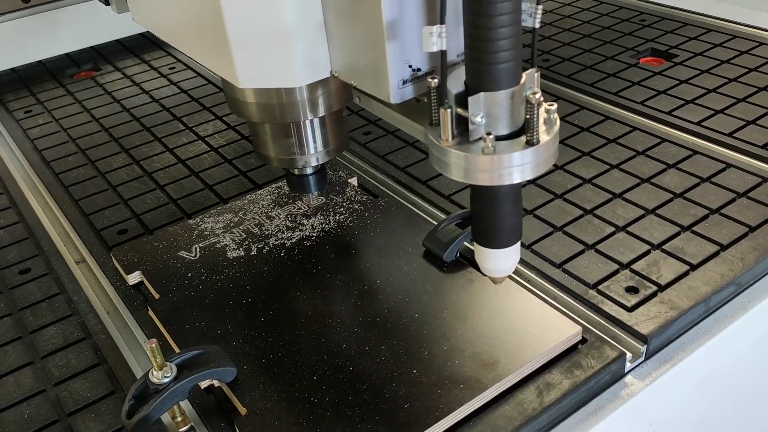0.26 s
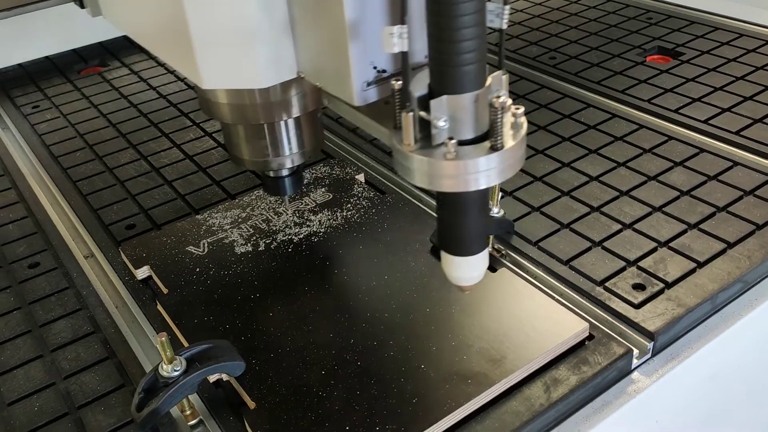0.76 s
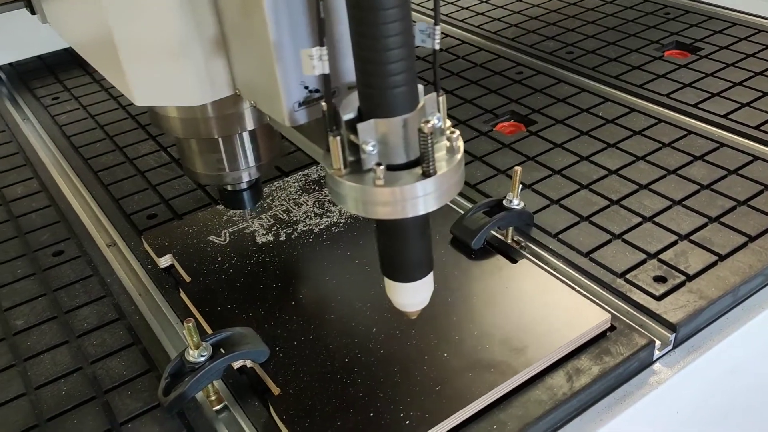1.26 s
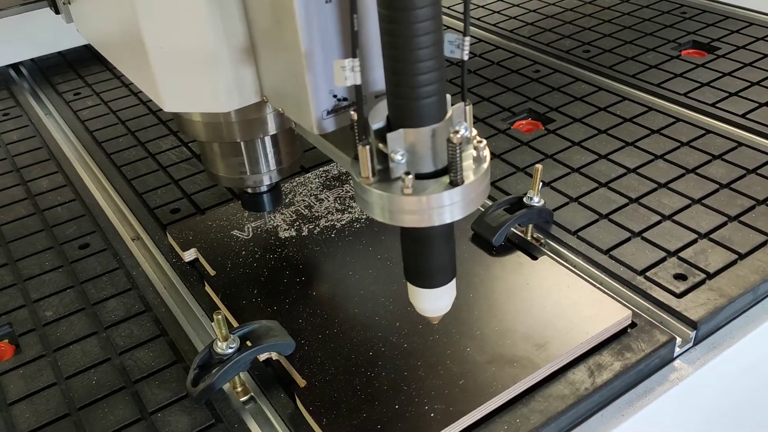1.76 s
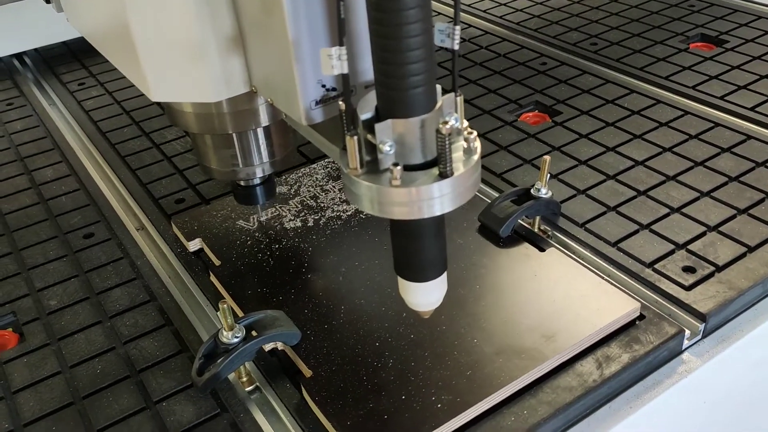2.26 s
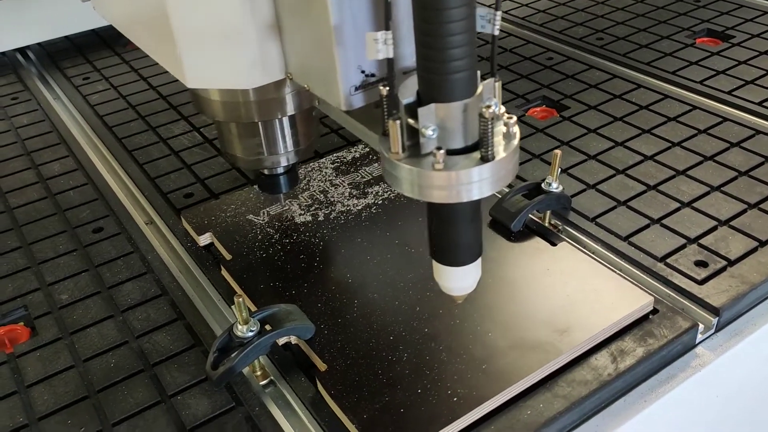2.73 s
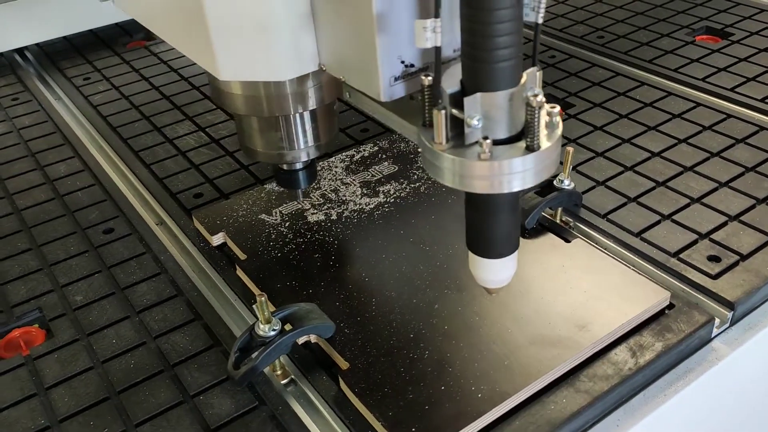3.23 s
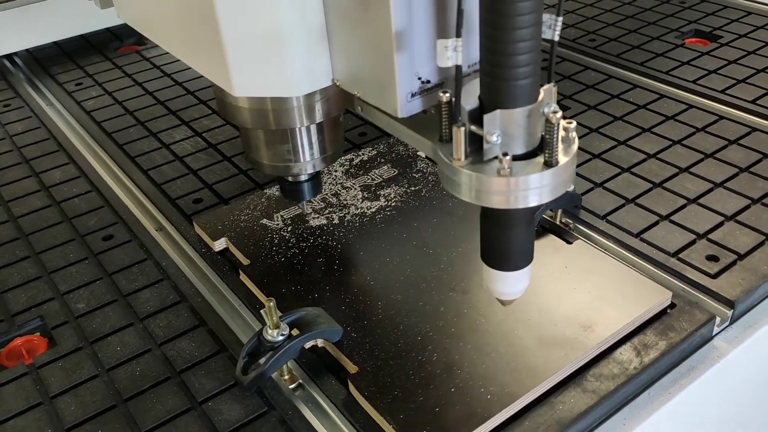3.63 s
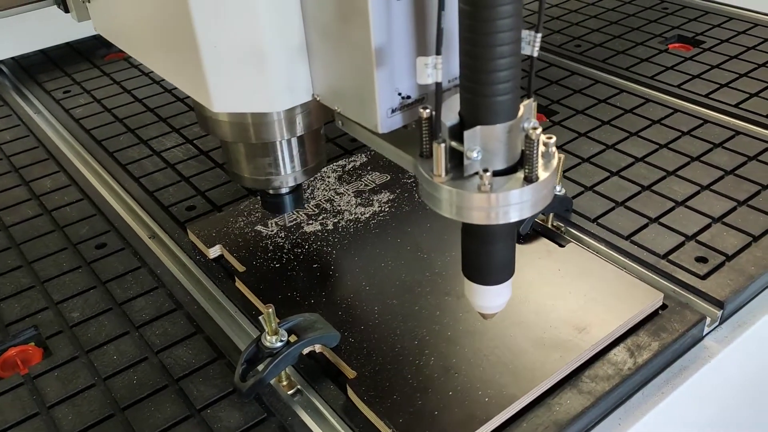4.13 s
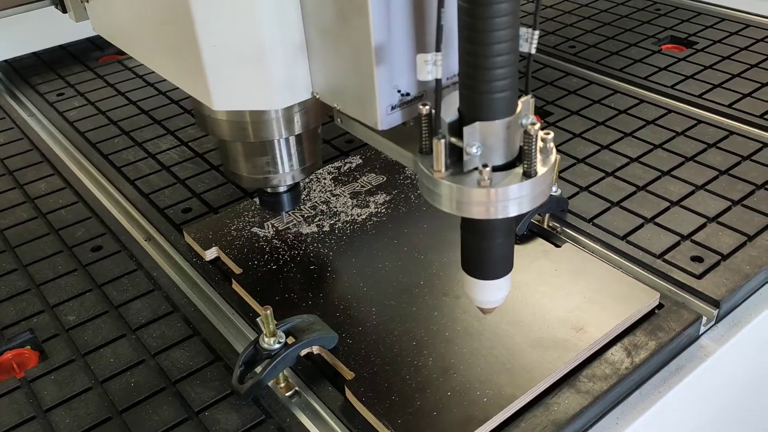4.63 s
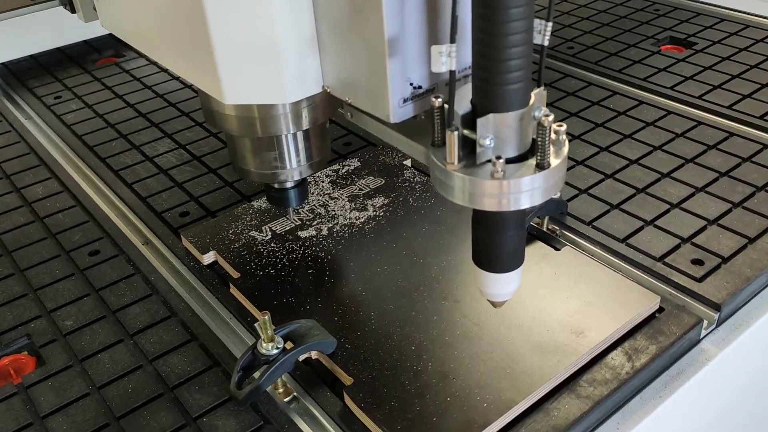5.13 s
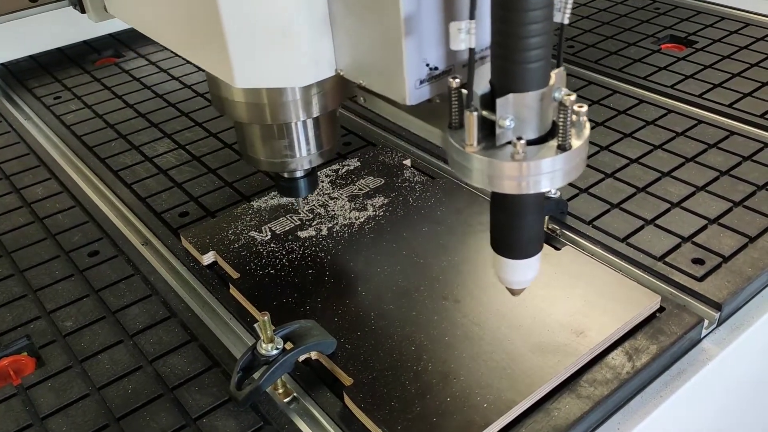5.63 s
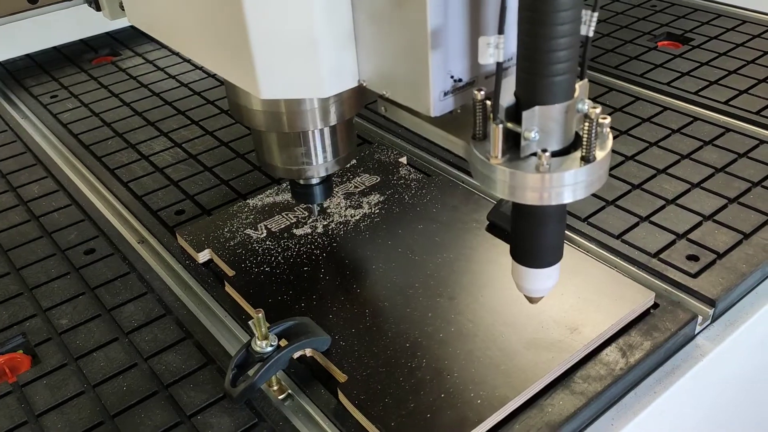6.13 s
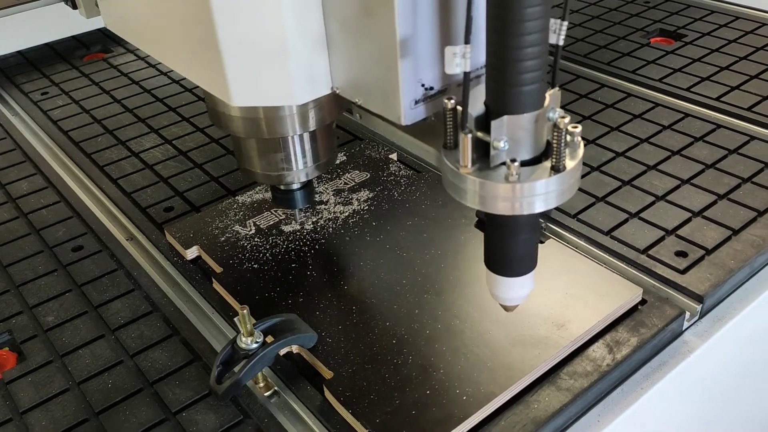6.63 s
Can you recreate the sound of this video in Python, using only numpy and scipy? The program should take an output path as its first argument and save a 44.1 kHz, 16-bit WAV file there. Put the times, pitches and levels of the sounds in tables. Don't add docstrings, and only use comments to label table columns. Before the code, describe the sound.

Close to an engraving router: constant smooth hum around a low-mid pitch, fan wash and a faint piercing whine. The tool bites metal at about 1.4, 3.5 and 6.4 seconds, adding harsh higher buzz and chip scrape that shift with each stroke, then stops quickly. The middle cut is a little softer, the last strongest. Phone microphone, slightly gated highs.

```python
import sys
import numpy as np
from scipy import signal
from scipy.io import wavfile
from scipy.ndimage import uniform_filter1d

SR = 44100
rng = np.random.default_rng(int(sys.argv[2]) if len(sys.argv) > 2 else 0)


def transcribe(signal):
    frames = np.atleast_2d(signal).T
    limited = np.clip(frames, -1, 1)
    pcm = np.round(limited * 32767).astype(np.int16)
    wavfile.write(sys.argv[1], SR, pcm)


def how_loud(loudness_db):
    steps = np.asarray(loudness_db, float) / 20
    return 10 ** steps


N = 303408

SHAFT_HZ, CARRIER_HZ = 294.2, 6000.4
HUM_DRAG_RAD = .3


def evened(x):
    return x / np.sqrt(np.mean(abs(x) ** 2) + 1e-20)


def read(points, hz):
    f, value = np.transpose(points)
    return np.interp(np.log(hz + 1), np.log(f + 1), value)


def columns(rows, t):
    s, *rest = np.transpose(rows)
    return [np.interp(t, s, c) for c in rest]


def drift(hz, count=1):
    a, b = rng.standard_normal((2, count, 4096))
    step = N // 4095 + 1
    f = np.fft.fftfreq(4096, step / SR)
    smooth = np.fft.fft(a + 1j * b) / (1 + (f / hz) ** 2)
    slow = evened(np.fft.ifft(smooth)).astype(np.complex64)
    part = (np.arange(step) / step).astype(np.float32)
    ramps = slow[:, :-1, None] + np.diff(slow)[:, :, None] * part
    return ramps.reshape(count, -1)[:, :N]


def tone(angle, db, lean_db=0, lead=0):
    side, angle = np.array([[.5], [-.5]]), (angle % (2 * np.pi)).astype(np.float32)
    wave = np.float32(np.sqrt(2) * how_loud(db)) * (np.cos(angle) + np.complex64(1j) * np.sin(angle))
    return wave * (how_loud(side * lean_db) * np.exp(1j * side * lead)).astype(np.complex64)


def noise(level_db, patchy_db):
    # pitch_hz, likeness (-1 to 1)
    likeness = [(60, .997), (160, .98), (300, .75), (480, .9), (800, .4), (1400, 0.05), (5300, 0.05),
                (6400, .85), (15000, .75)]
    # pitch_hz, left_right_db
    noise_lean = [(300, -0.5), (800, 0), (1600, 4.5), (2500, 2.5), (3600, -6), (5300, 3.5), (15000, -13.5)]
    port_lag_s = .0001
    frames, hz = N // 256 + 5, np.fft.rfftfreq(1024, 1 / SR)
    a, b, c, d, patches = np.ascontiguousarray(rng.standard_normal((frames, 513, 5), np.float32).T)
    patches = evened(uniform_filter1d(uniform_filter1d(patches, 12, 0), 14, 1))
    same = np.float32(np.clip(read(likeness, hz), -1, 1)[:, None])
    left = a + 1j * b
    right = same * left + np.sqrt(1 - same ** 2) * (c + 1j * d)
    z = np.array([left, right])
    z[1] *= np.exp(2j * np.pi * port_lag_s * hz * (hz < 5200))[:, None]
    sample = signal.istft(left[:, :200], nperseg=1024, noverlap=768)[1][1024:-1024]
    white = np.std(sample) / np.sqrt(SR / 2)
    lean_db = np.array([.5, -.5])[:, None, None] * read(noise_lean, hz)[:, None]
    z *= how_loud(level_db(hz[:, None], np.arange(frames) * 256 / SR) + lean_db + patchy_db * patches)
    return signal.istft(z, nperseg=1024, noverlap=768)[1][:, :N] / white


def toolpath(t):
    # plunge_s, depth_db, squeal across the grain_db, order 4 extra_db, rasp edge_db
    cuts = [
        (-1.19, -1, 1.5, -2, 8),
        (1.432, 0, 0, 0, -1),
        (3.537, -1.2, -3.5, -.3, -1),
        (6.358, 2, .3, 2, -1),
    ]
    # start after plunge_s, start load (0-1), end load (0-1), sideways feed (0-1), corner stall (0-1)
    strokes = [
        (0.0, .55, .7, .05, 0),
        (.083, .7, .8, .9, .8),
        (.218, 1, .9, .2, .6),
        (.318, .9, 1, .3, .25),
        (.818, .8, .8, 1, .8),
        (.948, 1, .75, .4, .8),
        (1.2, .72, .68, .15, .3),
        (1.488, .8, .85, 1.02, 0),
    ]
    # time_s, length_s, level against a full cut_db
    skims = [
        (.45, .1, -12),
        (1.3, .12, -14),
        (3.06, .04, -9),
        (3.25, .08, -15),
        (5.2, .1, -9),
        (5.44, .1, -7),
        (5.82, .06, -12),
        (6.08, .09, -6),
    ]
    lift_s, ease_s, turn_s, stall_s, ring_db_per_s = 1.542, .042, .022, .025, 400
    s = np.arange(-2, N / SR + 1, 1 / 500)
    contact, load, sideways, stall, skim, pressed = np.zeros((6, len(s)))
    starts, *_ = np.transpose(strokes)
    for plunge, *_ in cuts:
        u = s - plunge
        bite = np.clip(u / turn_s, 0, 1)
        contact += bite * how_loud(-ring_db_per_s * np.maximum(u - lift_s + turn_s, 0))
        pressed += bite * np.clip((lift_s - ease_s - u) / turn_s, 0, 1)
        for (a, first, last, across, stop), b in zip(strokes, [*starts[1:], 9]):
            on = np.clip((u - a) / turn_s + .5, 0, 1) - np.clip((u - b) / turn_s + .5, 0, 1)
            on = on * (u < lift_s + .3)
            load += on * np.interp(u, [a, min(b, lift_s)], [first, last])
            sideways += on * across
            stall += stop * np.exp(-((u - a) / stall_s) ** 2)
    for at, length, db in skims:
        skim += how_loud(db) * np.exp(-((s - at) / length) ** 2)
    running = np.maximum(np.searchsorted(np.array(cuts)[:, 0] - .1, s) - 1, 0)
    depth_db, squeal_db, fourth_db, rasp_db = np.array(cuts)[running, 1:].T
    curves = dict(contact=contact, skim=skim, load=load, sideways=sideways, stall=stall, pressed=pressed,
                  depth_db=depth_db, squeal_db=squeal_db, fourth_db=fourth_db, rasp_db=rasp_db)
    return {name: np.interp(t, s, curve) for name, curve in curves.items()}


def spindle(t, turn, path):
    # time_s, level_db, left_right_db
    hum_curve = [(0.0, -17, -1), (0.15, -16, -.9), (.3, -16.3, -.9), (0.62, -15.6, -.9), (0.78, -17, -1.1),
                 (1.4, -15.7, -.8), (2.9, -15.4, -.3), (3.45, -14.4, -.1), (4.2, -15.2, .2),
                 (4.95, -15.6, .1), (5.1, -14.9, .1), (5.55, -14, .2), (6.25, -15.2, .2), (6.88, -15, .6)]
    # time_s, level_db, left_right_db
    octave_curve = [(0.05, -45, -1.0), (1.03, -46, 3.5), (1.47, -54, 6.0), (1.62, -35, 5.0),
                    (1.7, -48, -2.5), (1.75, -44, 16.5), (1.96, -55, 3.5), (2.55, -37, 4.5),
                    (2.68, -40, -2.5), (3.52, -37, -3.5), (3.76, -45, -9.0), (3.91, -36, 1.0),
                    (4.37, -42, 1.0), (4.8, -37, -15.5), (5.56, -49, -3.5), (6.26, -42, -1.0),
                    (6.62, -47, -12.0), (6.85, -43, -14.5)]
    cut_db, load_db, stall_db = 1.5, 1.4, -2.2
    pressed, stall = path["pressed"], path["stall"]
    level_db, lean_db = columns(hum_curve, t)
    level_db = level_db + pressed * (cut_db + load_db * path["load"]) + stall_db * stall
    hum = tone(turn - HUM_DRAG_RAD * pressed, level_db, lean_db, lead=-.19) * (1 + 0.031 * drift(23))
    octave = tone(2 * turn + 3.7, *columns(octave_curve, t), lead=-0.99) * how_loud(1.5 - 4 * stall)
    return hum + octave * (1 + .13 * drift(27, count=2))


def cutter(turn, path):
    # level_db, change with sideways feed_db, with load_db,
    # in a stall_db, tool in the air_db
    order_rules = [(-40.5, -2, 11, -13, -60), (-34, .8, 3, -4, -60), (-43.5, 10, 2, -4, -61),
                   (-46, 9, 1.1, -3, -54)]
    # left_right_db, left lead_rad, start_rad
    order_ports = [(1.5, -0.88, -0.5), (12.5, 0.87, -2.5), (16, 0.92, 1.53), (10.5, 1.96, 0.7)]
    upper_db = [-13, -14, -18.5, -19, -69, -14.5, -42]
    blur = (.12, .12, .28, .45)
    skim_power, skim_tilt_db = 1.7, -6
    skim_waver = .6
    depth_db = path["depth_db"]
    extra_db = (0, path["fourth_db"], path["squeal_db"], -depth_db)
    skim = path["skim"] * abs(1 + skim_waver * drift(12)[0]) * how_loud(-1.2)
    out = 0
    for k, rule, own_db, rough, port in zip(range(3, 7), order_rules, extra_db, blur, order_ports):
        db, feed_db, load_db, stall_db, air_db = rule
        lean_db, lead, start = port
        cut_db = db + depth_db + own_db + feed_db * path["sideways"]
        cut_db = cut_db + load_db * path["load"] + stall_db * path["stall"]
        skim_gain = skim ** skim_power * how_loud(db + load_db + skim_tilt_db * (k - 3))
        gain = (path["contact"] * how_loud(cut_db) + skim_gain + how_loud(air_db)).astype(np.float32)
        out = out + gain * tone(k * turn + start, 0, lean_db, lead) * (1 + rough * drift(26, count=2))
    for k, db in zip(range(7, 14), upper_db):
        start = 2 * np.pi * rng.random()
        out = out + gain * tone(k * turn + start, db, 3) * (1 + 1.15 * drift(22, count=2))
    return out


def chips(turn):
    # pitch_hz, density against their level_db per Hz
    plate = [(300, -41), (700, -39), (1000, -29.5), (1320, -27.5), (1680, -20.5), (1950, -28.5),
             (2500, -34), (3400, -32.5), (4300, -35), (5300, -35.5), (6400, -33), (7300, -37.5),
             (9000, -49), (15500, -73)]
    cut_db, load_db, air_db, edge_air_db = -45, 3, -52.5, 6

    def density_db(hz, s):
        path = toolpath(s)
        contact = path["contact"]
        scrape = (contact + path["skim"]) * how_loud(cut_db + load_db * path["load"])
        level_db = 20 * np.log10(scrape + how_loud(air_db))
        edge_db = contact * path["rasp_db"] + (1 - contact) * edge_air_db - 3
        edge_shape = np.exp(-(np.log(hz / 2200 + 1e-9) / 0.21) ** 2)
        return read(plate, hz) + level_db + edge_db * edge_shape
    return noise(density_db, patchy_db=1.5) * (1 + 0.23 * np.cos(turn))


def echoes(t, hz, k):
    # time_s, plate path_mm, wall path_mm
    echo_paths = [(0.0, 43.1, 61.5), (0.46, 24.2, 45.3), (0.92, 34.3, 65.4), (1.38, 44.2, 16.0),
                  (1.83, 40.9, 2.4), (2.29, 35.5, -4.6), (2.75, 32.7, 3.9), (3.21, 11.0, -6.6),
                  (3.67, -7.9, -18.6), (4.13, -38.3, -18.5), (4.59, -35.0, -16.3), (5.05, -21.7, -21.5),
                  (5.5, -31.6, -16.8), (5.96, -45.4, -34.9), (6.42, -45.6, -38.1), (6.88, -39.8, -18.8)]
    plate_echo = [(0.99, 0.81, 0.66), (1.34, 0.1, 0.88), (0.26, 0.46, 0.36), (1.86, 0.49, 0.56),
                  (0.49, 0.57, 0.58)]
    wall_echo = [(1.14, 0.6, 0.96), (1.87, 0.57, 0.78), (0.42, 0.71, 0.69), (0.55, 0.55, 0.85),
                 (0.63, 0.19, 0.25)]
    # share of direct, offset_hz, start_turns
    neighbour = [(1.4, 0.14, 0.66), (0.26, -0.25, 0.82), (0.2, -1.05, 0.39), (0.69, 0.46, 0.18),
                 (0.5, 0.33, 0.05)]
    sound_mm_per_s = 343000
    s = t[::64]
    share, beat_hz, start = neighbour[k]
    total = 1 + share * np.exp(2j * np.pi * (beat_hz * s + start))
    for (share, *offsets), path_mm in zip((plate_echo[k], wall_echo[k]), columns(echo_paths, s)):
        turns = np.array(offsets)[:, None] + hz * path_mm / sound_mm_per_s
        total = total + share * np.exp(2j * np.pi * turns)
    return np.array([np.interp(t, s, abs(port)) for port in total], np.float32) * np.float32(how_loud(.7))


def whine(t, turn):
    # direct level_db, left_right_db
    strong_tones = [(-50.2, -0.3), (-47.1, 1.6), (-44.2, -0.5), (-51.0, -0.3), (-46.4, 0.9)]
    faint_lines = [(1, -7), (1, -4), (1, -3), (2, -22), (0, 20), (1, 0), (1, 4), (0, 25), (1, 5), (2, -6),
                   (2, -4), (1, 19), (2, 0), (2, 2), (2, 6), (1, 25), (3, -18), (3, -12), (2, 4)]
    faint_levels = [-60, -57, -57, -54, -58, -59, -53, -60, -58, -58, -63, -56, -57, -61, -60, -63, -62,
                    -66, -69]
    slot_count = 22
    carrier = 2 * np.pi * CARRIER_HZ * t
    slot = tone(slot_count * turn, *strong_tones[-1]) * echoes(t, slot_count * SHAFT_HZ, -1)
    out = slot * (1 + 0.35 * drift(9.1, count=2))
    swing_s, swing_width_s, swing_rad = 3.4, .3, 1.6
    swing = swing_rad * np.exp(-((t - swing_s) / swing_width_s) ** 2)
    for n, (k, lead) in enumerate(zip((-5, -1, 1, 3), (1.2 + swing, 1.0, 0.7, 0.0))):
        heard = echoes(t, CARRIER_HZ + k * SHAFT_HZ, n) * (1 + 0.16 * drift(24, count=2))
        start = 2 * np.pi * rng.random()
        out = out + tone(carrier + k * turn + start, *strong_tones[n], lead) * heard
    for (m, k), db in zip(faint_lines, faint_levels):
        start = 2 * np.pi * rng.random()
        line = tone(m * carrier + k * turn + start, db, -2.5)
        out = out + line * (.55 + .6 * drift(1.8, count=2))
    return out


def air():
    # pitch_hz, density_db per Hz
    wash = [(60, -100), (120, -83), (165, -66.5), (200, -73), (290, -60), (480, -74.5), (800, -73.6),
            (1320, -77.5), (2500, -78), (4200, -80.5), (7300, -80.5), (8500, -88.5), (11000, -90.5),
            (15500, -103)]
    # pitch_hz, width_hz, density_db per Hz
    housing = [(1098, 48, -61.5), (1750, 78, -67.5), (1996, 62, -65.5), (6310, 660, -72.5)]
    # pitch_hz, density against its level_db per Hz
    rumble_shape = [(20, -39), (50, -47), (85, -20.5), (120, -42), (170, -20), (300, -47)]
    base_db, rapid_db, stall_db, lumps_db = -66, 10, 10, 3
    lumps = drift(1.5)[0].real

    def density_db(hz, s):
        path = toolpath(s)
        gantry_db = base_db + rapid_db * (1 - path["contact"]) + stall_db * path["stall"]
        gantry_db = gantry_db + lumps_db * lumps[np.minimum(s * SR, N - 1).astype(int)]
        bumps = sum(how_loud(db) ** 2 / (1 + (2 * (hz - f) / w) ** 2) ** 2 for f, w, db in housing)
        rumble = how_loud(read(rumble_shape, hz) + gantry_db) ** 2
        return 10 * np.log10(how_loud(read(wash, hz)) ** 2 + bumps + rumble)
    return noise(density_db, patchy_db=2.0)


def scene():
    t = np.arange(N) / SR
    turn = 2 * np.pi * SHAFT_HZ * t + 0.028 * drift(2)[0].real
    path = toolpath(t)
    tones = spindle(t, turn, path) + cutter(turn - HUM_DRAG_RAD, path) + whine(t, turn)
    return tones.real + chips(turn) + air()


def gate(x):
    # pitch_hz, threshold against the band's mean_db
    bite = [(2000, -20), (2600, -8), (3200, -6), (3700, -10), (4900, -7), (6000, -18), (7300, -3),
            (8500, -4), (10500, -2), (12000, -3), (14500, -4), (15500, -12)]
    from_hz, spread_db, side_extra_db = 2100, 7, 1
    hz, t, z = signal.stft([x[0] + x[1], x[0] - x[1]], SR, nperseg=2048, noverlap=1536)
    band = (18 * np.log(hz + 1)).astype(int)
    jumps = rng.standard_normal((2, len(t), band[-1] + 1))
    jumps = evened(uniform_filter1d(jumps, size=6, axis=1))
    power = uniform_filter1d(abs(z) ** 2, size=3, axis=1)
    mean = uniform_filter1d(uniform_filter1d(power, size=32, axis=1), size=9, axis=2)
    limit_db = read(bite, hz)[:, None] + spread_db * jumps[:, :, band].transpose(0, 2, 1)
    limit = mean * how_loud(limit_db) ** 2
    limit[1, hz > CARRIER_HZ] *= how_loud(side_extra_db) ** 2
    limit[:, hz < from_hz] = 0
    mid, side = signal.istft(z * (power > limit), SR, nperseg=2048, noverlap=1536)[1][:, :N] / 2
    return np.array([mid + side, mid - side])


def band_limit(x):
    return signal.sosfilt(signal.butter(12, 15610, fs=SR, output="sos"), x)


def record(dry):
    gated = gate(dry)
    return band_limit(gated)


dry = scene()
out = record(dry)
transcribe(out)
```